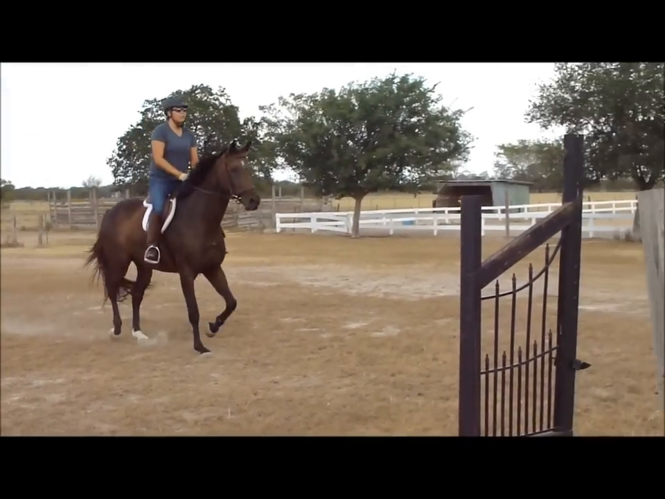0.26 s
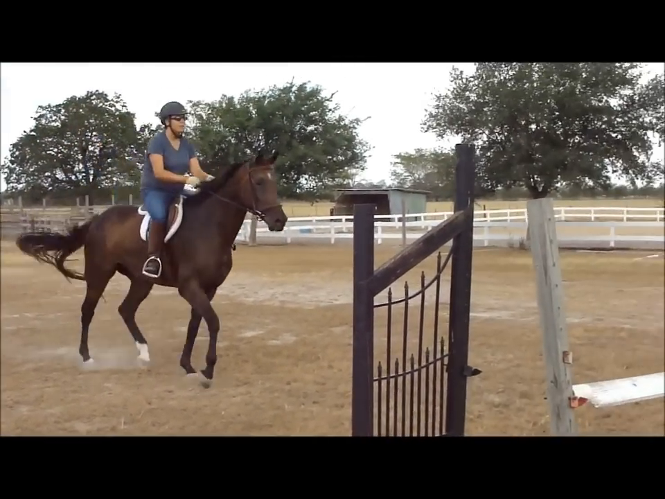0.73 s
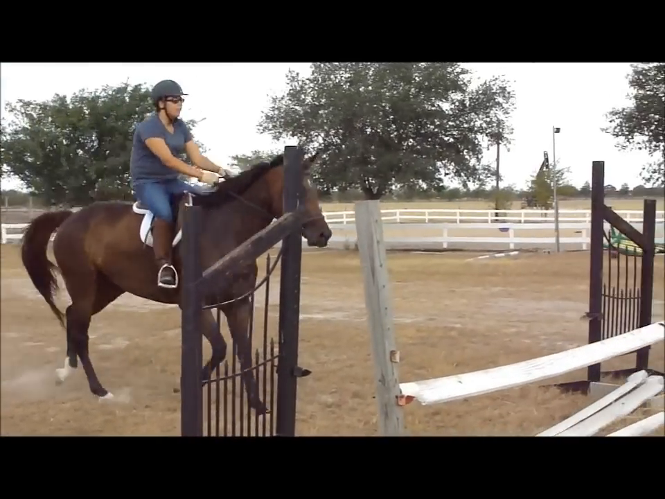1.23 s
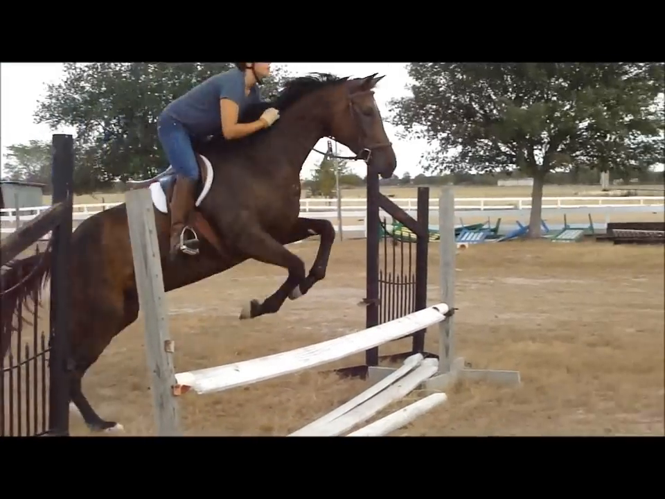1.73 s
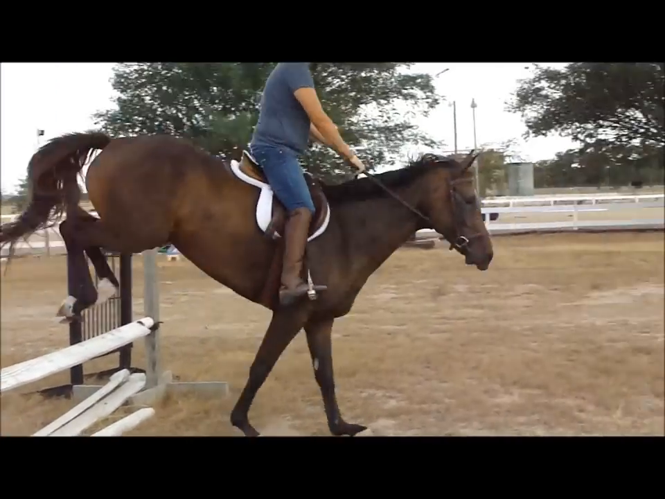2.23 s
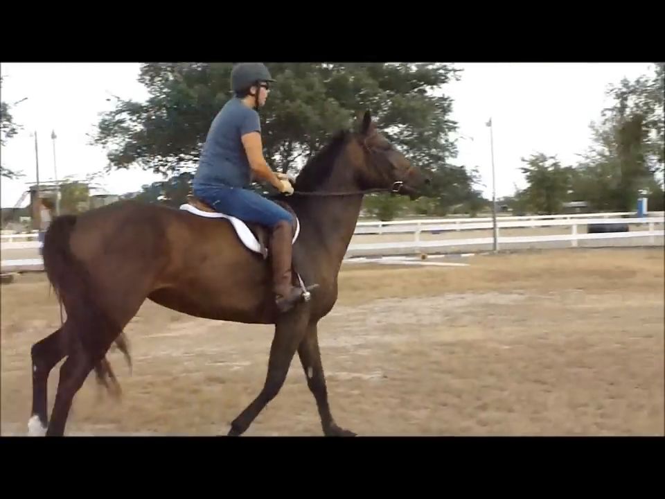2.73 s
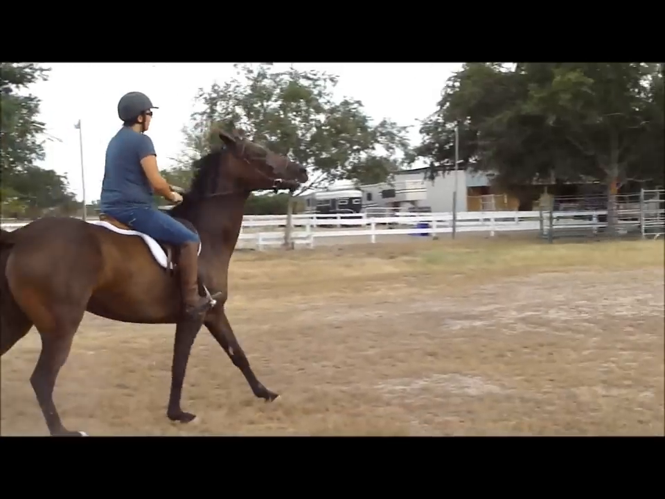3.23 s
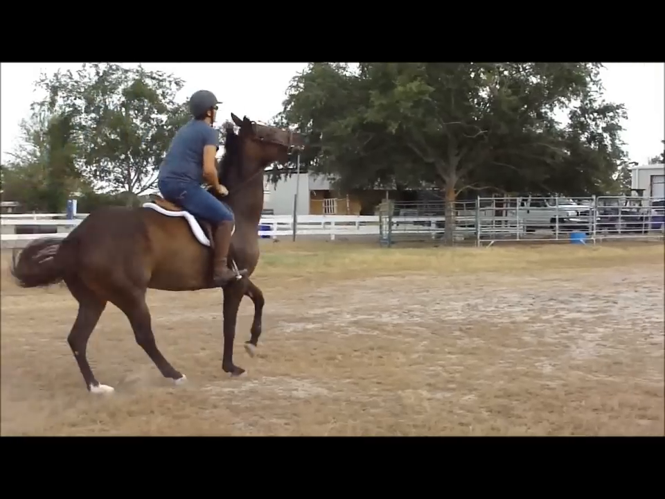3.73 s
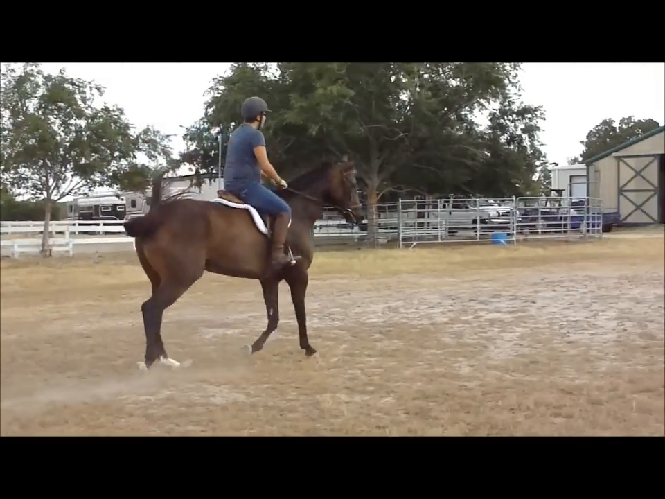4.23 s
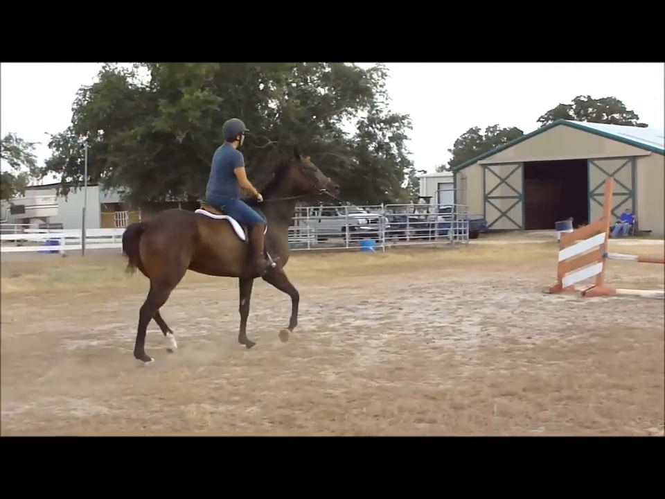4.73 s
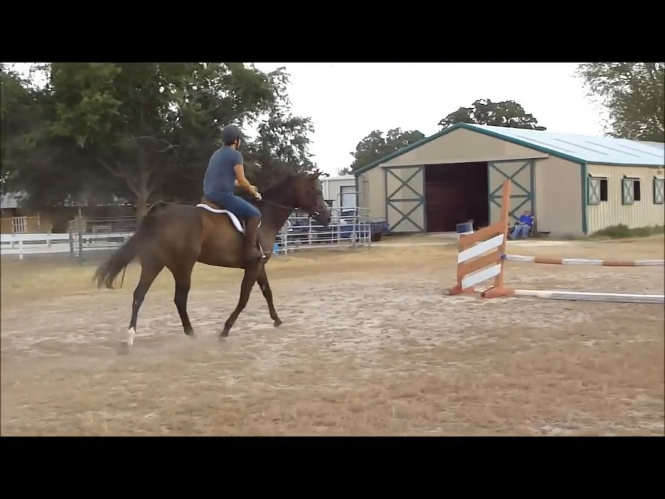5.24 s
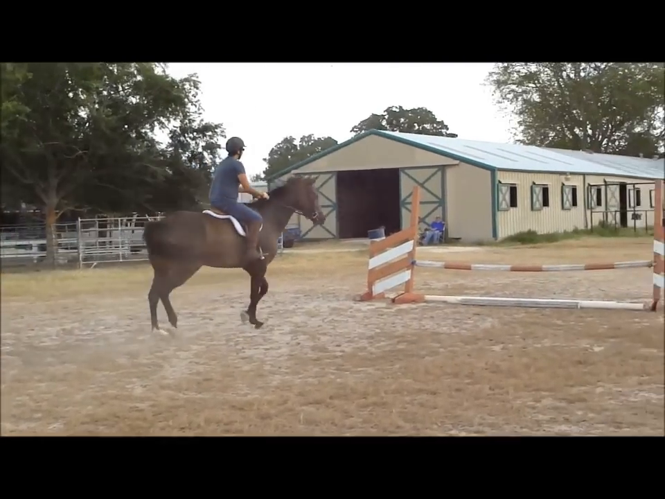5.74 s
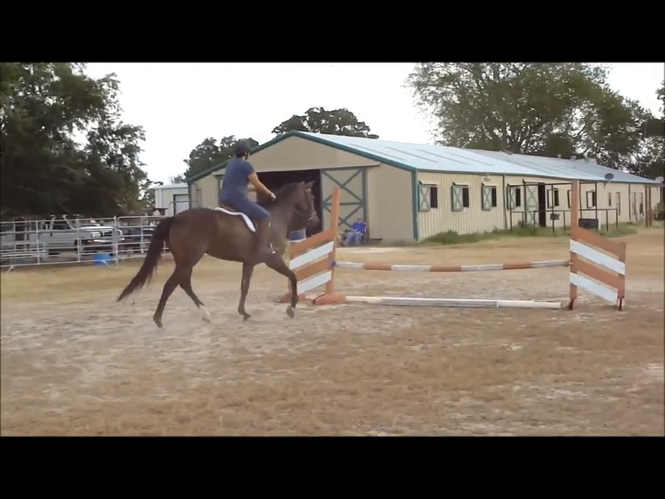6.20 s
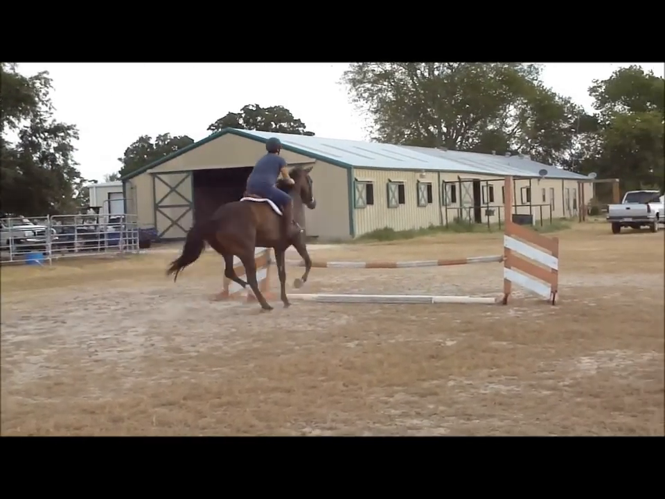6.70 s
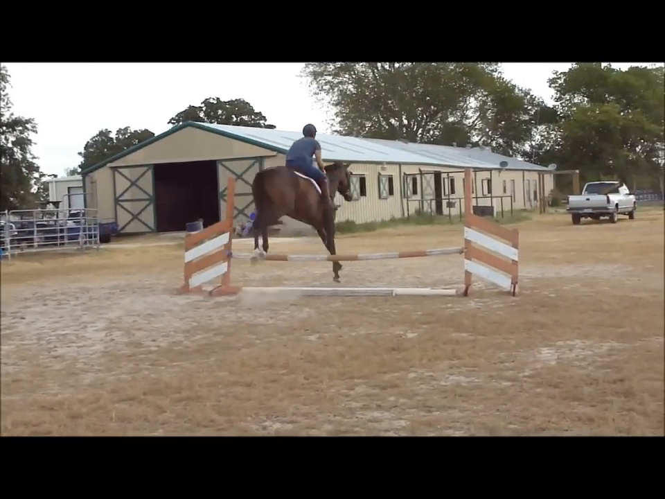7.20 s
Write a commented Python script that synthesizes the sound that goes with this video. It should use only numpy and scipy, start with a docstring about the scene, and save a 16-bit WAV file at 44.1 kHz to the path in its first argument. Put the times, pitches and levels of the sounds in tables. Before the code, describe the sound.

Gusty wind buffets a bare microphone throughout, a lumpy rumble with sharp pops and clicks. Beneath it a horse canters over dry dirt in an outdoor arena, hooves scuffing grit, leather rustling and the bit jingling faintly. It lands a jump close by with low thuds and two fluttering snorts, then moves away. Near the end comes a short double knock from a far jump.

```python
"""Gusty wind tumbles over a bare microphone port throughout: a lumpy rumble with sharp buffets, clicks
and rough flurries, over faint air hiss, traffic and insects. A horse canters past on dry dirt: coat
and leather rustle, hooves scuff grit, and from 1.5 s the bit jingles. It lands from a jump
with low thuds and snorts at 2.3 s and 2.8 s, its nostrils chopping the breath into puffs.
A bird chips once at 5.4 s; at 7 s a far jump is knocked."""
import sys
import numpy as np
from scipy import signal
from scipy.fft import rfft, irfft, next_fast_len
from scipy.io import wavfile

SR = 44100
rng = np.random.default_rng(int(sys.argv[2]) if len(sys.argv) > 2 else 0)


def put_to_file(sound):
    """Save the sound as 16-bit audio at rate SR, in the file named by the first command-line argument."""
    columns = np.atleast_2d(sound).T  # one column per channel
    safe = np.clip(columns, -1, 1)
    whole_steps = np.round(safe * 32767)
    wavfile.write(sys.argv[1], SR, whole_steps.astype(np.int16))


N = 328986


def from_db(db):
    """dB to gain."""
    return 10 ** (np.asarray(db) / 20)


def rms_one(x):
    """x scaled to rms 1."""
    return x / np.sqrt(np.mean(x ** 2) + 1e-20)


def in_time(rows):
    """Columns of a time table, one value per sample."""
    times_s, *columns = np.transpose(rows)
    return [np.interp(np.arange(N) / SR, times_s, column) for column in columns]


def coloured(x, spectrum):
    """x shaped by (frequency [Hz], level [dB]) points; rms 1."""
    size = next_fast_len(N)
    hz = np.maximum(np.arange(size // 2 + 1) * SR / size, 1)
    points_hz, points_db = np.transpose(spectrum)
    gain = from_db(np.interp(np.log(hz), np.log(points_hz), points_db))
    return rms_one(irfft(rfft(x, size) * gain, size)[:N])


def drift(rate_hz):
    """Random wander below rate_hz; rms 1."""
    r = np.exp(-2 * np.pi * rate_hz / SR)
    return rms_one(signal.lfilter([1], [1, -2 * r, r * r], rng.standard_normal(N + SR))[SR:])


def butter(x, hz, kind, order=2):
    """Butterworth filter."""
    return signal.sosfilt(signal.butter(order, hz, kind, fs=SR, output="sos"), x)


def resonance(x, hz, width_hz):
    """Two-pole band-pass, peak gain 1."""
    r = np.exp(-np.pi * width_hz / SR)
    feedback = [1, -2 * r * np.cos(2 * np.pi * hz / SR), r * r]
    return signal.lfilter(np.array([1, 0, -1]) * (1 - r * r) / 2, feedback, x)


def add(out, s, piece):
    """Mix piece into out from time s."""
    i = max(round(s * SR), 0)
    out[i:i + len(piece)] += piece[:N - i]


def wavelet(hz, cycles, phase):
    """Gaussian pressure blip and its start-to-centre time [s]."""
    spread_s = cycles / hz
    t = np.arange(-3 * spread_s, 3 * spread_s, 1 / SR)
    return np.exp(-.5 * (t / spread_s) ** 2) * np.cos(2 * np.pi * hz * t + phase), 3 * spread_s


def nearness(times_s, window_s):
    """0-1: a bump window_s wide around each time."""
    marks = np.zeros(N)
    marks[(times_s * SR).astype(int)] = 1
    return np.minimum(signal.fftconvolve(marks, np.hanning(round(window_s * SR)), "same"), 1)


# flow over the port: (time [s], rumble level [dB], brightness [dB])
WIND = [(0.0, -14.5, -23), (0.13, -27, -22), (0.27, -18, -29), (0.6, -19, -20), (0.97, -20, -15.5),
        (1.36, -21, -28.5), (2.08, -22, -25.5), (2.3, -28, -31), (2.45, -29.5, -20), (2.55, -44, -13),
        (2.75, -39, -9), (3.02, -24.5, -31), (3.22, -18, -30), (3.32, -23, -41.5), (3.66, -20, -29.5),
        (3.86, -35, -19), (3.98, -29, -17.5), (4.06, -26, -26), (4.12, -23, -23), (4.6, -20, -18),
        (5.05, -24, -20.5), (5.14, -29, -34), (5.22, -23.5, -19.5), (5.9, -19.5, -25), (6.1, -25, -25),
        (6.3, -22.5, -26.5), (6.45, -25, -28), (6.69, -26.5, -21), (6.73, -31, -23), (7.03, -28.5, -16),
        (7.05, -18.5, -19), (7.23, -26.5, -25.5), (7.25, -23.5, -25), (7.46, -28, -15)]
# sag between strong eddies: (time [s], depth [dB])
LULLS = [(0.0, 3), (0.5, 0.5), (1.4, 1), (2.2, 1.5), (3.0, 3), (3.8, 1.5), (4.2, 4), (5.0, 4.5), (5.7, 4.5),
         (6.4, 4), (6.6, 2), (7.46, 6)]
# turbulence: (frequency [Hz], level [dB])
RUMBLE_SPECTRUM = [(12, -74), (20, -3), (89, -0.5), (128, 0), (403, -3), (1210, -12), (3500, -47.5),
                   (4550, -75), (7700, -120)]
# eddy sizes: (band top [Hz], swing with clumps [dB], brightness weight, offset [dB])
EDDY_BANDS = [(114, -10, 0.056, -12), (306, 1, 0.027, 3.5), (574, 3, 0.2, 3), (970, 7, 0.49, 4),
              (1470, 4, 0.73, -1.5), (2400, 10.5, 1.1, -4.5), (4050, 14.5, 1.2, -6.5)]


def wind(strong_eddies_s):
    """Eddies come in clumps; the smaller they are, the more they keep to the clump tops."""
    rumble_db, bright_db = in_time(WIND)
    sag_db = in_time(LULLS)[0]
    clumps = 1.74 * np.tanh((0.32 * drift(40) + 0.73 * drift(124)) / 1.36)
    wake = np.clip(0.56 + 0.14 * sag_db, 0, 1.6)   # small eddies gather round strong ones
    clumps = np.minimum(clumps + wake * (nearness(strong_eddies_s, window_s=0.019) - .4), 1.3)
    rough_db = flurries()
    treble_db = bright_db + rough_db + 4.5 * drift(rate_hz=4)
    spiky = rng.standard_normal(N) * from_db(3.5 * np.clip(drift(610), -2, 2))
    eddies = coloured(spiky, RUMBLE_SPECTRUM)
    out, below = 0, 0
    for top_hz, swing_db, weight, offset_db in EDDY_BANDS:
        # zero phase: bands sum without gaps
        up_to = signal.sosfiltfilt(signal.butter(2, top_hz, fs=SR, output="sos"), eddies)
        out += (up_to - below) * from_db(swing_db * clumps + weight * treble_db + offset_db)
        below = up_to
    lull_db = sag_db * (1 - nearness(strong_eddies_s, window_s=0.04))
    return from_db(rumble_db + 0.1 * rough_db - lull_db) * out


# spells of rough flow: (end [s], length [s], roughness [dB])
FLURRIES = [(0.078, 0.065, 7.5), (0.31, 0.11, 17), (0.532, 0.21, 10.5), (0.714, 0.15, 4),
            (0.905, 0.13, 12.5), (1.148, 0.11, 18.5), (1.277, 0.11, 24), (1.565, 0.094, 15),
            (1.7, 0.052, 2), (2.119, 0.24, 8), (3.27, 0.12, 12), (3.48, 0.15, 16.5), (3.72, 0.1, 19.5),
            (3.99, 0.041, 19.5), (4.214, 0.16, 13.5), (4.423, 0.14, 13), (4.554, 0.062, 11),
            (4.675, 0.18, 14.5), (4.83, 0.095, 6), (5.072, 0.16, 19), (5.257, 0.082, 17.5),
            (5.416, 0.2, 18.5), (5.6, 0.088, 19.5), (5.779, 0.31, 10.5), (5.963, 0.13, 9),
            (6.05, 0.049, 10.5), (6.213, 0.061, 11.5), (6.25, 0.028, 18.5), (6.392, 0.1, 9),
            (7.237, 0.13, 11)]


def flurries(rise_share=0.31, calm_s=0.0067):
    """Roughness [dB]: the flow turns rough, holds, then calms at once."""
    t, out = np.arange(N) / SR, np.zeros(N)
    for end_s, length_s, db in FLURRIES:
        corners_s = [end_s - length_s, end_s - length_s * (1 - rise_share), end_s, end_s + calm_s]
        out = np.maximum(out, np.interp(t, corners_s, [0, db, db, 0]))
    return out


# open-air hiss: (frequency [Hz], level [dB])
AIR_SPECTRUM = [(700, -30), (1200, 6), (2000, 2), (3200, -2), (6000, -4), (10000, -5), (12000, -6)]
# far traffic and field noise: (frequency [Hz], level [dB])
TRAFFIC_SPECTRUM = [(15, -16), (40, 10), (200, 2.5), (500, -38), (1000, -34), (1600, -26), (3000, -74)]
AIR_DB, TRAFFIC_DB, INSECT_DB = -61, -37, -82


def surroundings(insect_hz=7830, width_hz=110):
    """Steady air hiss, far traffic murmur and a faint insect band."""
    air = from_db(AIR_DB) * coloured(rng.standard_normal(N), AIR_SPECTRUM)
    traffic = from_db(TRAFFIC_DB) * coloured(rng.standard_normal(N), TRAFFIC_SPECTRUM)
    insects = resonance(resonance(rng.standard_normal(N), insect_hz, width_hz), insect_hz, width_hz)
    return air + traffic + from_db(INSECT_DB) * rms_one(insects)


# dust, coat and leather: (time [s], level [dB])
RUSTLE = [(0.0, -56.5), (1.6, -56), (1.83, -52), (2.1, -56), (2.45, -47.5), (2.56, -51.5), (2.66, -46.5),
          (3.1, -50.5), (3.52, -48), (3.62, -53), (3.9, -52), (4.08, -50.5), (4.14, -56), (6.3, -58),
          (6.75, -54), (7.1, -54.5), (7.46, -54.5)]
# dry friction, rustle and scuffs alike: (frequency [Hz], level [dB])
GRIT_SPECTRUM = [(710, -7), (1200, -4.5), (1870, -5.5), (2070, -4), (2410, -4.5), (3140, -5.5), (9720, -10),
                 (11400, -13), (14800, -47), (22000, -120)]


def rustle():
    """Hiss that swells as the horse nears, patchier when louder."""
    level_db = in_time(RUSTLE)[0]
    patchy_db = np.clip(0.1 * (level_db - AIR_DB), 0, 2) * drift(30)
    return from_db(level_db + patchy_db) * coloured(rng.standard_normal(N), GRIT_SPECTRUM)


def lesser_eddies(rate_per_s=8, centre_hz=372):
    """Random eddies that scale with the rumble; columns as STRONG_EDDIES."""
    gap, level, pitch, edge = rng.random(size=(200, 4)).T
    times_s = np.cumsum(-np.log(1 - gap) / rate_per_s)
    wind_s, rumble_db, _ = np.transpose(WIND)
    db = np.interp(times_s, wind_s, rumble_db) + 16 * level
    rows = np.transpose([times_s, db, centre_hz * 2 ** (pitch - .5), -48.5 + 28 * edge])
    return rows[times_s < N / SR - .02]


# single eddies: (time [s], level [dB], nominal pitch [Hz], nominal edge level re blip [dB])
STRONG_EDDIES = [(0.032, -3.5, 410, -24), (0.071, -5, 430, -45), (0.088, -10, 450, -41),
                 (0.166, -8.5, 350, -46), (0.212, -3.5, 544, -23), (0.263, -7, 453, -26),
                 (0.283, -7, 583, -31), (0.335, -15, 341, -39), (0.401, -15, 298, -22),
                 (0.461, -13, 313, -40), (0.486, -11, 360, -40), (0.53, -8, 375, -16.5),
                 (0.673, -22, 307, -36), (0.689, -13, 305, -47), (0.715, -4, 430, -31),
                 (0.757, -8, 202, -43), (0.781, -6, 560, -16), (0.823, -24, 505, -28),
                 (0.833, -15, 417, -24), (0.859, -6, 413, -30), (0.887, -9.5, 390, -13.5),
                 (0.957, -11, 331, -41), (1.044, -7, 436, -37), (1.065, -17, 560, -24),
                 (1.09, -17, 545, -28), (1.124, -2, 353, -18), (1.139, -5, 530, -21),
                 (1.173, -12, 409, -14), (1.191, -17, 640, -12), (1.238, -4, 627, -16),
                 (1.26, -7, 380, -29), (1.318, -3, 394, -27), (1.336, -6, 310, -45), (1.4, -11, 302, -44),
                 (1.434, -12, 414, -45), (1.45, -16, 327, -43), (1.49, -5.5, 372, -29),
                 (1.533, -9, 280, -31), (1.571, -4, 413, -40), (1.615, -17, 407, -37),
                 (1.647, -3, 513, -32), (1.675, -5.5, 243, -40), (1.686, -8.5, 507, -23),
                 (1.819, -11.5, 531, -20), (1.879, -18, 580, -40), (1.952, -12, 334, -33),
                 (1.982, -5, 430, -24), (2.029, -12, 404, -41), (2.054, -6.5, 328, -25),
                 (2.079, -25, 372, -31), (2.11, -11.5, 425, -18), (2.253, -11, 454, -38),
                 (2.326, -6.5, 363, -14), (2.987, -25, 239, -38), (3.012, -13, 284, -37),
                 (3.044, -9, 455, -43), (3.172, -9, 472, -21), (3.232, -6, 400, -40),
                 (3.262, -15, 350, -39), (3.383, -8, 337, -41), (3.425, -18, 340, -38),
                 (3.466, -7, 297, -36), (3.584, -6.5, 248, -42), (3.66, -5.5, 403, -36),
                 (3.697, -9, 600, -38), (3.872, -4, 272, -24), (3.91, -9, 312, -35),
                 (3.936, -10.5, 360, -35), (3.964, -9, 574, -34), (3.976, -2.5, 363, -42),
                 (3.992, -2, 440, -23), (4.109, -0.5, 344, -15), (4.129, -6, 470, -33),
                 (4.147, -11, 396, -32), (4.172, -1.5, 457, -26.5), (4.177, -5, 520, -27),
                 (4.204, -2.5, 430, -40), (4.237, -6, 390, -29), (4.267, -9, 300, -17),
                 (4.28, 0, 513, -22.5), (4.295, -5, 375, -33), (4.32, -2, 397, -38), (4.333, -22, 513, -26),
                 (4.366, -11, 297, -34), (4.389, -5, 470, -22), (4.419, -3.5, 520, -24),
                 (4.463, -8.5, 194, -35), (4.499, -11, 375, -39), (4.514, -4, 410, -36),
                 (4.523, -5.5, 447, -42), (4.598, -8, 344, -8.5), (4.645, -2.5, 540, -33),
                 (4.664, -18, 500, -31), (4.7, -11, 360, -21), (4.72, -3.5, 410, -30),
                 (4.752, -5, 325, -23), (4.762, -2.5, 617, -32), (4.78, -5.5, 487, -35),
                 (4.822, 1, 427, -33), (4.846, -9, 430, -30), (4.884, -25, 370, -28),
                 (4.907, -2, 415, -21.5), (4.914, 0.5, 390, -14.5), (4.967, -1, 514, -17),
                 (4.991, -6.5, 667, -17), (5.009, -6, 408, -16.5), (5.031, -5.5, 370, -28),
                 (5.047, -24, 357, -27), (5.112, -29, 500, -14), (5.074, -9.5, 363, -36),
                 (5.182, -9, 413, -45), (5.2, -3.5, 326, -35), (5.238, -4.5, 293, -35),
                 (5.308, -10.5, 302, -15), (5.339, -4, 404, -22), (5.379, -6, 594, -13.5),
                 (5.411, -13, 320, -28), (5.478, -10.5, 447, -22), (5.488, -6.5, 400, -27),
                 (5.508, -11, 380, -21), (5.532, -7, 320, -22), (5.571, -3.5, 450, -20),
                 (5.58, -6.5, 453, -23), (5.641, -13, 333, -34), (5.681, -6.5, 554, -29),
                 (5.692, -7, 410, -35), (5.772, -6.5, 350, -24), (5.817, -8.5, 393, -33),
                 (5.909, -15, 360, -28), (5.931, -8, 343, -35), (5.97, -7, 375, -16.5),
                 (6.029, -6, 354, -44), (6.111, -21, 577, -40), (6.183, -4, 316, -33),
                 (6.197, -8, 399, -31), (6.245, -10, 403, -16), (6.294, -8, 370, -31),
                 (6.331, -29, 520, -31), (6.374, -0.5, 336, -22), (6.381, -3.5, 410, -25.5),
                 (6.413, -11, 353, -43), (6.438, -19, 251, -42), (6.686, -11, 367, -33),
                 (6.701, -18, 282, -25), (6.808, -16.5, 294, -20.5), (6.878, -22, 545, -9),
                 (7.055, -6, 236, -43), (7.097, -21, 395, -34), (7.13, -15, 276, -36),
                 (7.155, -10, 230, -41), (7.164, -16, 504, -26), (7.181, -8, 445, -33),
                 (7.214, -15, 208, -42), (7.228, -7.5, 323, -37), (7.235, -14, 336, -35),
                 (7.276, -16, 315, -42), (7.449, -5, 313, -37)]


def buffets(eddies, swirl_hz=1044):
    """Each eddy: a lopsided blip between two weaker ones, a crisp swirl at its edge."""
    out = np.zeros(N)
    for (s, db, hz, edge_db), (u, v, w) in zip(eddies, rng.random(size=(300, 3))):
        blip, lead_s = wavelet(0.87 * hz, cycles=0.24, phase=2 * np.pi * u)
        add(out, s - lead_s, from_db(db) * blip)
        add(out, s - lead_s + (1.14 + v) / hz, from_db(db - 9) * blip[::-1])
        add(out, s - lead_s - (1.136 + w) / hz, from_db(db - 11) * -blip)
        swirl, lead_s = wavelet(swirl_hz, cycles=0.26, phase=2 * np.pi * v)
        add(out, s - lead_s, from_db(db + edge_db + 12) * swirl)
    return out


# sharp clicks: (time [s], peak [dB], centre [Hz])
CLICKS = [(0.032, -39, 3980), (0.399, -43, 5000), (0.533, -37.5, 3980), (1.125, -33, 3500),
          (1.414, -36, 7500), (1.438, -31, 7500), (2.635, -29.5, 6500), (3.172, -25, 1920),
          (3.355, -22.5, 1750), (4.107, -29, 3500), (4.966, -37, 4500), (5.307, -34, 3500),
          (5.376, -29, 7500), (5.533, -39.5, 3940), (5.968, -34.5, 4940), (6.373, -35, 3940),
          (7.042, -36, 3470), (7.068, -50, 3500), (7.364, -34.5, 2800), (7.415, -38, 3340)]


def clicks(spread_s=0.00097):
    """Sharp clicks, mostly the crisp snap of wind buffets on the microphone."""
    out, t = np.zeros(N), np.arange(200) / SR
    for s, db, hz in CLICKS:
        burst = rng.standard_normal(len(t)) * np.exp(-.5 * ((t - .0015) / spread_s) ** 2)
        burst = resonance(resonance(burst, hz, 0.95 * hz), hz, 0.95 * hz)
        add(out, s - .001, from_db(db) * burst / np.abs(burst).max())
    return out


# hooves on dirt: (start [s], level [dB], length [s])
SCUFFS = [(0.138, -53.5, 0.1), (0.34, -48.5, 0.025), (0.576, -53, .02), (1.27, -50, 0.033),
          (1.46, -49.5, 0.021), (1.486, -46.5, 0.049), (1.641, -43.5, 0.019), (1.713, -44, 0.017),
          (2.156, -47, .02), (2.217, -39, 0.016), (2.466, -46.5, 0.036), (2.578, -35.5, 0.034),
          (2.692, -50, 0.042), (2.725, -42, 0.1), (3.045, -43.5, .035), (3.185, -40, 0.037),
          (3.225, -49, 0.087), (3.305, -41, 0.056), (3.368, -44, 0.022), (3.413, -39.5, 0.047),
          (3.459, -46.5, 0.027), (3.641, -48, 0.028), (3.675, -41, 0.032), (3.715, -46, .01),
          (3.758, -41.5, .036), (3.806, -48.5, 0.06), (3.902, -49.5, .1), (4.255, -51, .03),
          (4.48, -55, .045), (4.578, -43, 0.023), (4.904, -37, 0.0091), (5.287, -51, .008),
          (6.799, -49.5, 0.0089), (6.87, -47.5, 0.013)]


def hoof_scuffs(swell_share=0.3, stop_s=0.0065):
    """Grit under a hoof swells, crunches on and stops short."""
    envelope, t = np.zeros(N), np.arange(SR // 5) / SR
    for s, db, length_s in SCUFFS:
        corners_s = [0, swell_share * length_s, length_s, length_s + stop_s]
        add(envelope, s, from_db(db) * np.interp(t, corners_s, [0, 1, 1, 0]))
    grains = rng.standard_normal(N) * from_db(3.5 * drift(370))
    return envelope * coloured(grains, GRIT_SPECTRUM)


# touches on the bit: (time [s], level [dB], favoured pitch [Hz])
BIT_TOUCHES = [(1.506, -42, 4600), (1.506, -43, 9500), (1.514, -43, 11000), (1.527, -42, 4600),
               (1.53, -42, 9500), (1.572, -41, 3000), (1.68, -39, 5700), (2.495, -42, 9600),
               (2.5, -38, 8200), (2.637, -33, 5700), (3.483, -41, 4600), (5.37, -50, 9500),
               (5.378, -47, 4600), (5.922, -44, 11500)]
# ringing metal: (frequency [Hz], level [dB], t60 [s])
BIT_MODES = [(3000, -8, .07), (4700, 0, .06), (5400, -10, .025), (8500, -6, .06), (9350, -1, .05),
             (10850, -4, .05)]


def bit_jingle(attack_s=0.0026):
    """Each touch rings the bit's modes near one pitch."""
    out, t = np.zeros(N), np.arange(SR // 8) / SR
    attack = np.minimum(t / attack_s, 1)
    for s, db, favoured_hz in BIT_TOUCHES:
        for hz, mode_db, t60_s in BIT_MODES:
            strength_db = db + mode_db - 150 * np.log2(hz / favoured_hz) ** 2
            add(out, s, from_db(strength_db - 60 * t / t60_s) * attack * np.sin(2 * np.pi * hz * t))
    return out


# nearest footfalls: (time [s], level [dB], centre [Hz])
THUDS = [(2.226, -5.5, 900), (2.594, -19, 584), (2.692, -19.5, 317), (2.817, -7, 297), (3.207, -2.5, 530),
         (3.211, -6, 443), (3.771, -7.5, 357)]


def hoof_thuds(puff_db=-17, puff_hz=450, fade_s=0.013):
    """The ground gives a low push and throws a puff of loose soil."""
    out, t = np.zeros(N), np.arange(3000) / SR
    for s, db, hz in THUDS:
        soil = resonance(rng.standard_normal(len(t)), puff_hz, puff_hz)
        puff = rms_one(butter(soil, 2 * puff_hz, "low", order=4)) * np.exp(-t / fade_s)
        add(out, s, from_db(db + puff_db) * puff)
        push, lead_s = wavelet(hz, cycles=0.35, phase=1.45)
        add(out, s - lead_s, from_db(db) * push)
    return out


# breaths and nostril flaps: (start [s], level [dB], length [s], hiss gain [dB])
FLAPS = [(2.264, -29, 0.121, 0.5), (2.866, -34, 0.1, 7), (2.267, -38, 0.012, 9), (2.275, -15, 0.036, -2.5),
         (2.309, -12.5, 0.026, -1), (2.342, -19, 0.034, 1), (2.376, -19.5, 0.038, 0.5),
         (2.412, -29, 0.014, 1), (2.44, -36, .02, -8), (2.79, -30, 0.032, -3), (2.821, -30, 0.041, -10),
         (2.857, -23.5, 0.051, -1), (2.907, -16.5, 0.025, -7), (2.942, -26.5, 0.042, -2)]
# nose resonances: (frequency [Hz], nominal width [Hz], level [dB])
NOSE_MODES = [(696, 78, 1.5), (1100, 250, 5.5), (1900, 370, 0.5), (2700, 290, 2.5), (3780, 170, -11.5),
              (5760, 170, -36)]


def snorts(gain_db=-9, skew=1.65):
    """Each flap lets a puff of breath through the nose resonances."""
    nose_envelope, hiss_envelope = np.zeros(N), np.zeros(N)
    for s, db, length_s, hiss_db in FLAPS:
        progress = np.linspace(0, 1, round(length_s * SR)) ** skew   # slow swell, fast shut
        puff = from_db(db + gain_db) * np.abs(np.sin(np.pi * progress)) ** 1.04
        add(nose_envelope, s, puff)
        add(hiss_envelope, s, from_db(hiss_db) * puff)
    breath = rng.standard_normal(N) * from_db(2.5 * drift(270))
    nose = sum((-1) ** k * from_db(db) * rms_one(resonance(breath, hz, 0.88 * width_hz))
               for k, (hz, width_hz, db) in enumerate(NOSE_MODES))
    hiss = butter(butter(breath, 1640, "high"), 4400, "low", order=1)
    return nose_envelope * rms_one(nose) + hiss_envelope * hiss


def bird(start_s=5.44, length_s=.03, start_hz=6950, end_hz=6750, level_db=-52):
    """One thin falling chip."""
    out, count = np.zeros(N), round(length_s * SR)
    phase = 2 * np.pi * np.cumsum(np.linspace(start_hz, end_hz, count)) / SR
    add(out, start_s, from_db(level_db) * np.hanning(count) ** .4 * np.sin(phase))
    return out


# hits on the far jump: (time [s], level [dB])
KNOCKS = [(7.0448, -6), (7.066, -9), (7.069, -6)]


def jump_knocks(knock_hz=990, body_hz=392, body_db=-12, crack_hz=1584, crack_db=-11.5):
    """A short double knock; each hit has a low body and a higher crack."""
    out = np.zeros(N)
    for hz, cycles, part_db in (knock_hz, .7, 0), (body_hz, .6, body_db), (crack_hz, .6, crack_db):
        blip, lead_s = wavelet(hz, cycles, phase=0)
        for s, db in KNOCKS:
            add(out, s - lead_s, from_db(db + part_db) * blip)
    return out


def scene():
    """All sources at one microphone."""
    strong = np.array(STRONG_EDDIES)
    eddies = np.vstack([strong, lesser_eddies()])
    gusts = wind(strong[:, 0]) + buffets(eddies)
    horse = hoof_thuds() + hoof_scuffs() + rustle() + snorts() + bit_jingle()
    return (gusts + clicks() + horse + surroundings() + bird() + jump_knocks())[None]


def record(dry, low_cut_hz=86.6, high_cut_hz=11000):
    """Microphone: deep bass dropped, peaks rounded, top cut."""
    thinned = butter(dry, low_cut_hz, "high")
    rounded = thinned / (1 + thinned ** 4) ** .25
    return .98 * signal.sosfilt(signal.ellip(10, .5, 60, high_cut_hz, fs=SR, output="sos"), rounded)


dry = scene()
out = record(dry)
put_to_file(out)
```